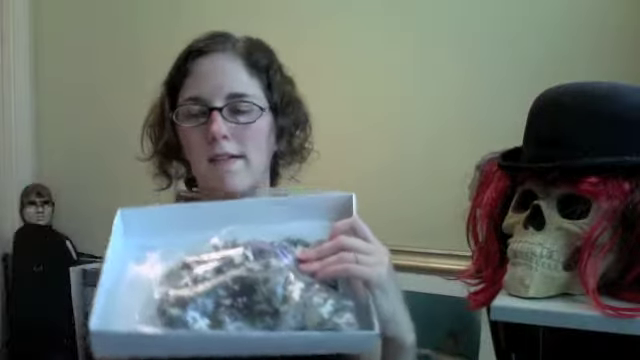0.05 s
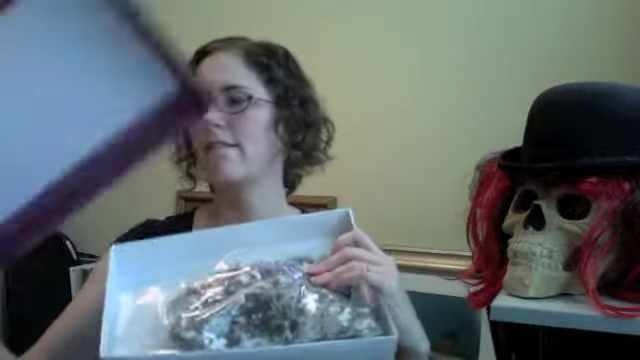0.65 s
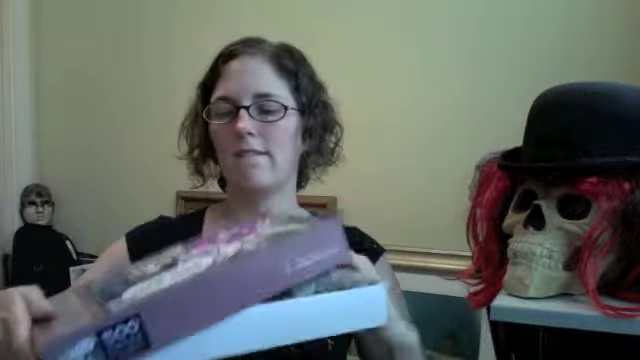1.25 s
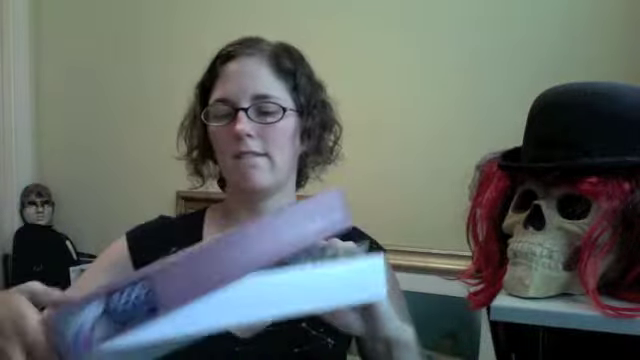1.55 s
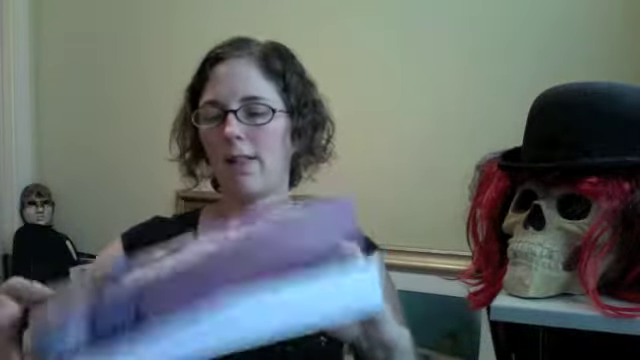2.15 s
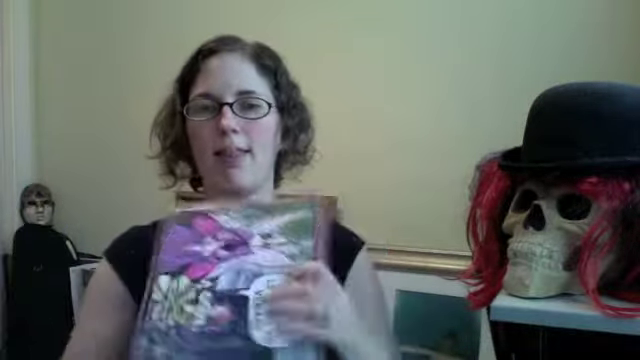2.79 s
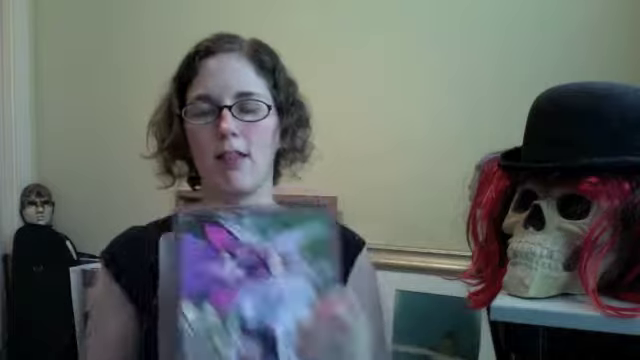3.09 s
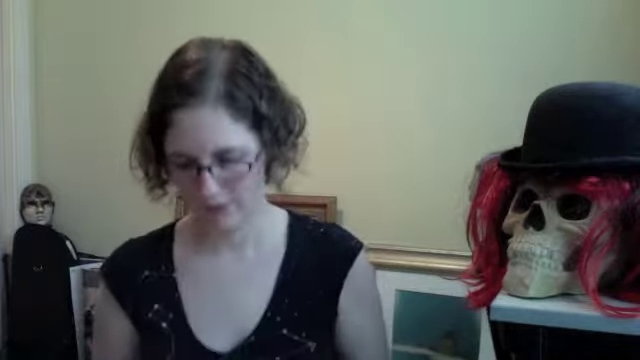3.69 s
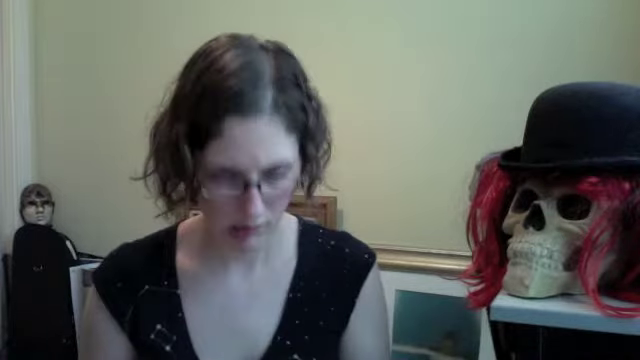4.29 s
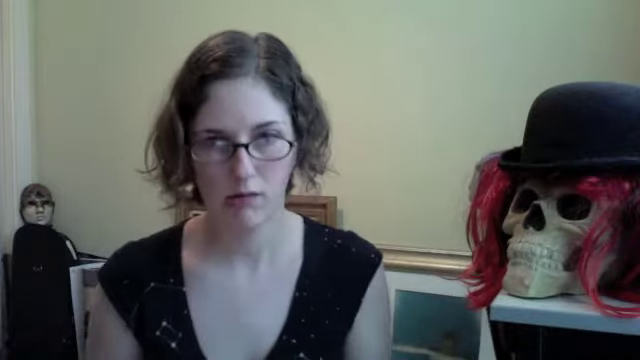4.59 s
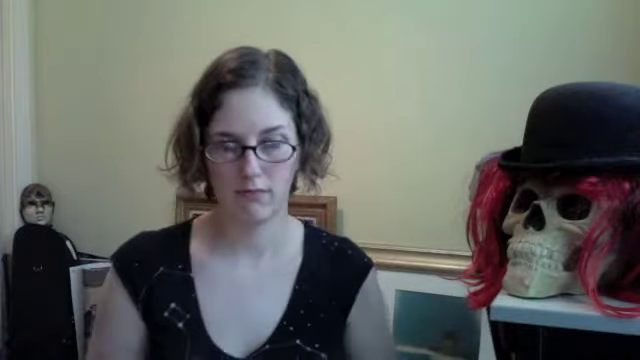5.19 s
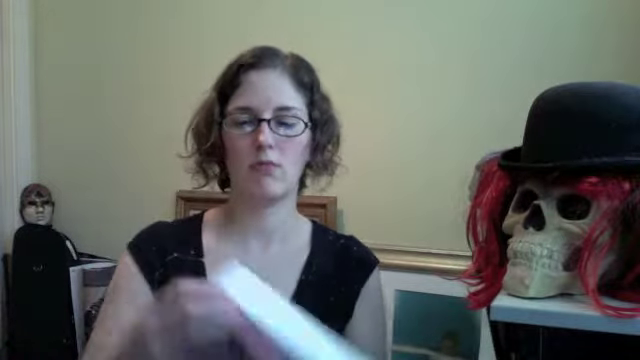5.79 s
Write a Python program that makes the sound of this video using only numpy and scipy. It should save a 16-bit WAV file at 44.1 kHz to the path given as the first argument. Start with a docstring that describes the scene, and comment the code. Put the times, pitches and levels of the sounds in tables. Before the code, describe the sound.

A cardboard box holding a plastic bag of puzzle pieces is handled near a small microphone in a small room. After a few light taps, the lid claps on with a quick cluster of hollow knocks, then scrapes and creaks as it is worked down. The box bumps on a desk several times, hands slide over it, and the bag crinkles faintly. A soft hiss and low hum lie behind.

```python
"""A small room: a cardboard box holding a plastic bag of puzzle pieces is closed, handled and put down.
The lid claps on and the box bumps on a desk; each blow rings the walls, thumps the box and jostles
the pieces. Card sticks and slips on card in creaks, rasps and scrapes, hands hiss over it,
and the bag and pieces crinkle and tick. Behind it are a soft hiss, a faint electronic whine,
a low hum and the drone of a far engine."""
import sys
import numpy as np
from scipy import signal
from scipy.fft import rfft, irfft, next_fast_len
from scipy.io import wavfile
from scipy.ndimage import uniform_filter1d

SR = 44100
rng = np.random.default_rng(int(sys.argv[2]) if len(sys.argv) > 2 else 0)


def wav_out(sig):
    """Save sig, one row per channel (or a flat mono array), as 16-bit PCM at SR to the path in sys.argv[1]."""
    wavfile.write(sys.argv[1], SR, np.round(np.clip(np.atleast_2d(sig).T, -1, 1) * 32767).astype(np.int16))


N = 266805
EVENT_N = int(0.35 * SR)
EVENT_T = np.arange(EVENT_N) / SR


def from_db(db):
    """Decibels to gain."""
    return 10 ** (np.asarray(db) / 20)


def in_time(rows):
    """Each column of a time curve at every sample."""
    times, *columns = np.transpose(rows)
    return [np.interp(np.arange(N) / SR, times, column) for column in columns]


def at_hz(points, hz):
    """Interpolate on a log-frequency axis."""
    points_hz, values = np.transpose(points)
    return np.interp(np.log(np.maximum(hz, 1)), np.log(points_hz), values)


def colour(x, spectrum):
    """Shape by a spectrum; rms 1."""
    size = next_fast_len(len(x))
    gain = from_db(at_hz(spectrum, np.fft.rfftfreq(size, 1 / SR)))
    shaped = irfft(rfft(x, size) * gain, size)[:len(x)]
    return shaped / np.std(shaped)


def cut(x, hz, kind, order=2):
    """Butterworth filter."""
    return signal.sosfilt(signal.butter(order, np.clip(hz, 10, 0.45 * SR), kind, fs=SR, output="sos"), x)


def resonance(x, hz, width_hz, order=2):
    """Band-pass by centre and width."""
    return cut(x, [hz - width_hz / 2, hz + width_hz / 2], "band", order)


def fade(t60_s):
    """Exponential decay over one event."""
    return np.exp(-np.log(1000) * EVENT_T / t60_s)


def peak_one(x):
    """Scale the loudest 6 ms to rms 1."""
    return x / np.sqrt(uniform_filter1d(x * x, size=256).max())


def add(track, start_s, sound):
    """Mix a sound in at a time."""
    i = max(int(start_s * SR), 0)
    track[i:i + len(sound)] += sound[:max(len(track) - i, 0)]


def struck(modes, spread_db):
    """Decaying modes; strengths vary with where the blow lands."""
    return sum(from_db(db + rng.normal(0, spread_db)) * fade(t60_s) * np.cos(2 * np.pi * hz * EVENT_T)
               for hz, db, t60_s in modes)


def grains(size, per_s, spread_db, smooth):
    """Fibres catch and let go: uneven clicks over smooth noise."""
    clicks = (rng.random(size) < per_s / SR) * rng.choice([-1, 1], size)
    clicks = clicks * from_db(spread_db * np.minimum(rng.exponential(1, size), 4))
    return clicks / (np.std(clicks) + 1e-9) + smooth * rng.standard_normal(size)


def strokes(rows, column, attack_s=0.021, sag_db_per_s=31, release_db_per_s=196):
    """Stroke envelope: attack, sag, release. Rows begin t/s, length/s; column picks the level/dB."""
    t, power = np.arange(N) / SR, 0
    for row in rows:
        start_s, length_s = row[:2]
        age_s = np.maximum(t - start_s, 0)
        db = row[column] - sag_db_per_s * age_s - release_db_per_s * np.maximum(age_s - length_s, 0)
        power += (np.minimum(age_s / attack_s, 1) * from_db(db)) ** 2
    return np.sqrt(power)


def drone(hz, db, waver=0.18):
    """A tone on a pitch curve, wavering in level and phase."""
    wobble = waver * colour(rng.standard_normal(N), [(1, -2.5), (6, -20.5), (30, -46.5), (200, -101)])
    phase = 2 * np.pi * np.cumsum(hz) / SR + wobble[::-1]
    return np.sqrt(2) * from_db(db) * (1 + wobble) * np.sin(phase)


# room noise: f/Hz, density/dB
AIR_SPECTRUM = [(15, -63), (25, -7), (69, -7.5), (110, 0.5), (156, -0.5), (305, -8), (421, -2.5),
                (598, -10.5), (919, -11), (1570, -20), (3440, -23.5), (4620, -31.5), (7700, -32),
                (10900, -36.5), (15500, -45)]


def air(level_db=-59):
    """Soft steady hiss, strongest in the bass."""
    return from_db(level_db) * colour(rng.standard_normal(N), AIR_SPECTRUM)


def whine(level_db=-86):
    """A narrow band of electronic hiss."""
    band = resonance(rng.standard_normal(N), hz=7460, width_hz=340)
    return from_db(level_db) * band / np.std(band)


# hum: t/s, f/Hz, level/dB
HUM_CURVE = [(0, 69.8, -92), (4.2, 69.6, -69), (4.33, 77.4, -62), (4.46, 90.5, -61.5), (4.53, 93, -50),
             (4.61, 94, -57.5), (4.95, 89.6, -61.5), (5.5, 91, -61), (6.05, 94.65, -58)]


def hum():
    """A low tone that rises and swells late."""
    return drone(*in_time(HUM_CURVE))


# engine: t/s, firing rate/Hz, level/dB
ENGINE_CURVE = [(0, 44, -52.5), (0.3, 43.7, -58.5), (0.75, 47, -59), (1.7, 48, -59), (1.95, 45, -64),
                (2.5, 44.3, -68), (3.0, 46, -63), (3.4, 47.5, -61.5), (4.2, 46, -66.5), (6.05, 46, -69)]
# partials: multiple, rel. level/dB
ENGINE_PARTIALS = [(2, -9.5), (3, -3), (4, -10)]


def engine():
    """A far engine draws away: harmonics of its firing rate."""
    firing_hz, engine_db = in_time(ENGINE_CURVE)
    return sum(drone(multiple * firing_hz, engine_db + db) for multiple, db in ENGINE_PARTIALS)


# room decay: f/Hz, t60/s
ROOM_DECAY = [(100, 0.27), (300, 0.25), (700, 0.25), (2000, 0.22), (5000, 0.061), (14000, 0.22)]
# desk and wall echoes: delay/s, gain
EARLY_ECHOES = [(.0058, 0.095), (.0083, 0.042), (0.016, 0.075)]


def room(x, wet_db):
    """Early echoes, then a diffuse tail that dies soonest near 5 kHz."""
    edges_hz = np.geomspace(60, 16000, 9)
    tail = sum(cut(rng.standard_normal(EVENT_N), [lo, hi], "band") * fade(at_hz(ROOM_DECAY, np.sqrt(lo * hi)))
               for lo, hi in zip(edges_hz, edges_hz[1:]))
    tail *= np.clip(EVENT_T / 0.016, 0, 1) ** 2
    response = from_db(wet_db) * tail / np.linalg.norm(tail)
    response[0] += 1
    for delay_s, gain in EARLY_ECHOES:
        add(response, delay_s, np.array([gain]))
    return signal.fftconvolve(x, response)[:N]


# plastic film: f/Hz, density/dB
FILM_SPECTRUM = [(2000, -8), (4500, -2), (5700, 7), (7300, -2.5), (9000, 3.5), (11500, 0.5), (13500, -5),
                 (15500, -14)]
# bag settling: t/s, length/s, level/dB
BAG_CRINKLES = [(0.0, 0.082, -69), (2.74, 0.05, -71), (3.228, 0.12, -64.5), (3.62, 0.18, -62.5),
                (3.89, 0.11, -60), (4.06, 0.18, -70), (4.728, .21, -51), (5.03, 0.04, -60),
                (5.68, 0.032, -66.5)]


def crinkling(snaps_per_s=1800, low_hz=4460, high_hz=15100, spread_db=2.5):
    """Creases in the film let go in a dense shower, each ringing at its own pitch."""
    shower, ring = np.zeros(N), fade(t60_s=0.044)[:SR // 10]
    for when, pitch, size in rng.random((int(snaps_per_s * N / SR), 3)):
        hz = low_hz + pitch * (high_hz - low_hz)
        db = spread_db * min(-np.log(size), 3)
        add(shower, when * N / SR, from_db(db) * ring * np.sin(2 * np.pi * hz * EVENT_T[:len(ring)]))
    return strokes(BAG_CRINKLES, column=2) * colour(shower, FILM_SPECTRUM)


# skin on card: f/Hz, density/dB
SKIN_SPECTRUM = [(1500, -3), (3400, 11), (4200, 7), (5000, 13), (6500, -4), (7400, -16), (8000, 9),
                 (8600, 10), (11000, 11), (14300, -4), (15500, -16)]
# hand strokes: t/s, length/s, hiss/dB, sing/dB
HAND_SLIDES = [(3.217, 0.06, -67, -61), (3.29, 0.038, -60, -57), (3.62, 0.14, -71, -70),
               (3.882, 0.089, -61, -74), (4.065, 0.27, -81, -66), (4.681, 0.04, -71, -72.5),
               (4.718, 0.26, -54, -63), (4.832, 0.068, -61, -55), (5.014, 0.05, -64, -72),
               (5.146, 0.28, -75.5, -76), (5.71, 0.26, -77, -85)]


def sliding(flicker_db=2.6):
    """Skin hisses on smooth card, each band flickering on its own; the pressed card sings."""
    skin = colour(grains(N, per_s=1100, spread_db=0.5, smooth=0.85), SKIN_SPECTRUM)
    hiss = np.zeros(N)
    edges_hz = np.linspace(1500, 16000, 12)
    for band_hz in zip(edges_hz, edges_hz[1:]):
        flicker = colour(rng.standard_normal(N), [(1, 2), (15, 3), (60, -20), (300, -28), (2000, -92)])
        hiss += from_db(flicker_db * flicker) * cut(skin, band_hz, "band", order=3)
    sing = resonance(grains(N, per_s=1300, spread_db=-4, smooth=0.93), hz=5680, width_hz=1160)
    return strokes(HAND_SLIDES, column=2) * hiss + strokes(HAND_SLIDES, column=3) * sing / np.std(sing)


# dull scrape and fine grit: f/Hz, density/dB
BODY_SPECTRUM = [(120, -17), (280, 6), (430, 8), (700, 1), (1100, -2.5), (1600, -10.5), (3000, -36.5)]
GRIT_SPECTRUM = [(900, -2), (1800, 11), (2600, 6), (3500, 10.5), (4500, 2.5), (6000, 4.5), (8000, -2),
                 (12000, -8), (15500, -63)]
# card and bag drags: t/s, length/s, rel. body/dB, rel. grit/dB
DRAGS = [ (0, 0.042, -46.5, -55), (0.65, 0.08, -55, -61), (1.124, 0.041, -49, -32), (1.36, 0.19, -50, -51),
         (1.634, 0.22, -53, -54.5), (1.869, 0.51, -52.5, -55.5), (2.456, 0.19, -47, -58),
         (2.632, 0.12, -41, -53), (2.726, 0.036, -36.5, -42.5), (2.855, 0.91, -53, -55.5),
         (3.294, 0.084, -38.5, -54), (3.578, 0.47, -52, -53.5), (3.975, 0.45, -53.5, -54.5),
         (4.717, 0.028, -46.5, -46.5), (4.956, 0.16, -51, -55), (5.13, 0.41, -49, -54),
         (5.56, 0.22, -60, -57.5), (5.81, 0.24, -50, -54)]


def rubbing():
    """The lid drags and the bag shifts; a floor remains, as the held box is never quite still."""
    shape = dict(attack_s=0.02, sag_db_per_s=8, release_db_per_s=162)
    body_gain = np.hypot(from_db(-74.5), strokes(DRAGS, column=2, **shape))
    grit_gain = np.hypot(from_db(-64), strokes(DRAGS, column=3, **shape))
    body = colour(grains(N, per_s=1500, spread_db=8, smooth=0.74), BODY_SPECTRUM)
    grit = colour(grains(N, per_s=2100, spread_db=-0.5, smooth=0.62), GRIT_SPECTRUM)
    return from_db(-4.5) * body_gain * body + from_db(-9) * grit_gain * grit


# lid creaks: start/s, end/s, rel. level/dB, slip rate/Hz, resonance/Hz
LID_CREAKS = [(1.625, 1.72, -49, 100, 1080), (1.806, 1.857, -52, 146, 957), (2.609, 2.678, -55, 176, 1745),
              (3.293, 3.352, -48.5, 110, 1630), (5.749, 5.793, -53.5, 156, 763),
              (5.903, 5.927, -57, 180, 1550), (5.983, 6.015, -54, 120, 1400),
              (6.023, 6.056, -49.5, 120, 1380)]


def creaks():
    """The lid sticks and slips; each slip rings a panel briefly, with a puff of grit."""
    out = np.zeros(N)
    for start_s, end_s, db, slip_hz, hz in LID_CREAKS:
        slips_s = start_s + np.cumsum(np.r_[0, rng.uniform(0.5, 1.5, 60)]) / slip_hz
        for slip_s in slips_s[slips_s < end_s]:
            detune = from_db(rng.normal(0, 1.2))
            modes = [(hz * detune, 0, 0.025), (hz * 0.8, -8, 0.02), (hz * 1.45, -12, 0.015)]
            ring = struck(modes, spread_db=2)
            grit = 1.2 * rng.standard_normal(EVENT_N) * fade(0.044)
            slip = cut((ring + grit) * (1 - fade(0.0086)), [hz / 2, hz * 1.35], "band")
            add(out, slip_s, from_db(db + rng.normal(0, 1)) * peak_one(slip))
    return out


# card and film resonances: f/Hz, width/Hz, level/dB
PAPER_BANDS = [(2840, 330, 2), (3480, 290, -0.5), (5720, 320, -2), (8670, 170, 2)]


def papery(x):
    """Add the narrow treble resonances of thin card."""
    return x + sum(from_db(db) * resonance(x, hz, width_hz, order=1) for hz, width_hz, db in PAPER_BANDS)


def boxed(x, delays_s=(0.0002, 0.0025), gain=0.66):
    """Four reflections inside the box give each spot its own hollow colour."""
    out = x.copy()
    for delay_s, sign in zip(rng.uniform(*delays_s, size=4), rng.choice([-1, 1], size=4)):
        add(out, delay_s, sign * gain * x)
    return out


# edge over card: t/s, length/s, level/dB, slip rate/Hz, low/Hz, high/Hz
EDGE_RASPS = [(0.006, 0.025, -49, 540, 3100, 3940), (1.384, 0.063, -54, 230, 800, 5470),
              (1.489, 0.035, -57.5, 340, 900, 3600), (1.66, 0.073, -54, 260, 855, 2540),
              (1.884, 0.04, -61.5, 890, 3200, 3570), (1.957, 0.046, -62, 450, 700, 3500),
              (2.711, 0.022, -46, 520, 1300, 2430), (3.308, .012, -46, 420, 900, 3800),
              (3.336, .012, -52, 500, 1500, 6000), (5.843, 0.027, -54.5, 880, 3620, 4400),
              (5.868, .018, -51, 600, 2390, 3970), (5.895, .008, -38, 460, 1150, 2030),
              (5.902, 0.015, -44.5, 420, 1100, 3640), (5.926, .028, -63, 450, 2300, 3520)]


def rasps(attack_s=0.0017, release_db_per_s=900, jitter=0.13):
    """A card edge slips hundreds of times a second; each slip rings the card."""
    out = np.zeros(N)
    for start_s, length_s, db, slip_hz, low_hz, high_hz in EDGE_RASPS:
        uneven = np.repeat(rng.standard_normal(EVENT_N), 64)[:EVENT_N]
        slip_count = np.floor(np.cumsum(slip_hz * (1 + jitter * uneven)) / SR)
        slips = np.diff(slip_count, prepend=-1)
        grit = 0.081 * rng.standard_normal(EVENT_N)
        rasp = cut(papery(boxed(slips + grit)), [low_hz, high_hz], "band", order=4)
        release_db = release_db_per_s * np.maximum(EVENT_T - length_s, 0)
        gain = np.minimum(EVENT_T / attack_s, 1) * from_db(db - release_db)
        add(out, start_s, gain * rasp / np.std(rasp))
    return out


# bag, pieces, fingernails: t/s, rel. level/dB, f/Hz, half t60/s
SMALL_TICKS = [ (0.006, -40, 3700, 0.024), (0.017, -47.5, 3600, 0.057), (0.035, -55, 3680, 0.027),
               (0.056, -48, 4050, 0.077), (0.085, -61, 5000, 0.052), (0.48, -46, 2470, 0.051),
               (0.489, -51, 5040, 0.021), (0.583, -65, 4000, 0.018), (0.594, -48.5, 4570, 0.038),
               (0.603, -67, 3100, 0.03), (0.666, -45.5, 6800, 0.0076), (0.691, -61, 9100, .03),
               (0.714, -53, 9500, 0.024), (0.742, -51.5, 11100, 0.029), (1.036, -46.5, 6900, 0.069),
               (1.128, -30.5, 5100, 0.016), (1.138, -42, 7000, 0.011), (1.15, -35, 6360, 0.025),
               (1.1865, -30, 6000, 0.012), (1.188, -35, 12000, 0.02), (1.194, -35.5, 10500, 0.02),
               (1.246, -35.5, 3500, 0.068), (1.376, -33, 4370, 0.027), (1.38, -40.5, 10800, 0.045),
               (1.422, -40.5, 4400, 0.037), (1.4757, -36.5, 2970, 0.046), (1.536, -44.5, 3600, 0.0077),
               (1.612, -48, 3580, .06), (1.672, -37, 3260, 0.056), (1.697, -42.5, 7200, 0.076),
               (1.7625, -36, 4230, 0.007), (1.765, -39, 3970, 0.077), (1.7653, -38.5, 11400, 0.013),
               (1.9649, -44.5, 3300, 0.018), (2.028, -50, 3460, 0.025), (2.151, -35.5, 3060, 0.0053),
               (2.167, -36.5, 5350, 0.01), (2.387, -50, 3600, 0.015), (2.397, -45, 4220, 0.029),
               (2.411, -47, 3800, 0.033), (2.4939, -32.5, 2550, 0.016), (2.572, -46.5, 2160, 0.067),
               (2.642, -50, 10940, 0.079), (2.718, -40, 4200, 0.13), (2.742, -31.5, 5060, 0.028),
               (2.751, -35, 5240, 0.023), (2.765, -42, 4830, 0.025), (2.786, -43, 4100, 0.068),
               (3.179, -52, 2480, 0.033), (3.226, -47.5, 6050, 0.093), (3.241, -49.5, 13000, 0.065),
               (3.307, -41, 4190, 0.13), (3.4341, -34, 8100, 0.061), (3.5561, -36.5, 6900, 0.045),
               (3.597, -40.5, 2460, 0.033), (3.605, -46, 6160, 0.03), (3.631, -50, 5600, 0.015),
               (3.711, -42, 1410, 0.054), (4.7363, -40.5, 3450, 0.028), (5.336, -45, 6100, 0.026),
               (5.346, -38.5, 2830, 0.02), (5.744, -40.5, 5870, 0.052), (5.845, -60, 5300, 0.041),
               (5.869, -43.5, 5330, 0.037), (5.907, -53, 5510, 0.023), (5.942, -43.5, 2870, .025),
               (6.026, -43, 5420, 0.021)]


def ticks(first_snap_db=21, film_hz=7060, film_db_per_octave=14.5):
    """A snap breaks into tiny ones; the card answers lower down, less so for the film's high ticks."""
    out = np.zeros(N)
    for start_s, db, hz, half_t60_s in SMALL_TICKS:
        snap = grains(EVENT_N, per_s=2500, spread_db=2.5, smooth=0.79) * fade(2.02 * half_t60_s)
        snap[0] += from_db(first_snap_db)
        snap = papery(cut(boxed(snap), [hz / 2.37, hz * 1.29], "band", order=3))
        card = cut(rng.standard_normal(EVENT_N) * fade(0.07), [600, 1400], "band")
        card_db = db - 1 - film_db_per_octave * max(np.log2(hz / film_hz), 0)
        add(out, start_s, from_db(db) * peak_one(snap) + from_db(card_db) * peak_one(card))
    return cut(out, hz=13000, kind="low", order=4)


def regripped(modes, detune=0.014):
    """Each new grip bends the card and shifts its modes."""
    return [(hz * (1 + rng.normal(0, detune)), db, t60_s) for hz, db, t60_s in modes]


# box walls: f/Hz, level/dB, t60/s
WALL_MODES = [(255, 4.5, 0.11), (316, -13, .06), (380, -5, 0.067), (416.6, 7.5, 0.16), (476, 2, 0.057),
              (578, 9.5, 0.062), (650, 4.5, .1), (730.6, 11, .1), (944, 3, 0.064), (1007, 7.5, 0.073),
              (1070, 0, 0.074), (1124, 3, 0.079), (1236, 2.5, 0.18), (1343, -11.5, .08), (1730, -8, .08),
              (1875, -11.5, 0.073), (2750, 14, .095)]
# loose pieces shaking the walls: f/Hz, density/dB
JOSTLE_SPECTRUM = [(120, -38), (310, -12), (430, -1), (700, -8.5), (1150, -8.5), (1550, -8.5),
                   (3000, -24.5)]


def wall_ring(envelope, contact_hz, panel_hz, t60_cycles=19):
    """The struck panel and the walls ring; the loose pieces jump a moment later."""
    panel = peak_one(np.sin(2 * np.pi * panel_hz * EVENT_T) * fade(t60_cycles / panel_hz))
    jostle = colour(rng.standard_normal(EVENT_N), JOSTLE_SPECTRUM) * (fade(0.16) - fade(0.0056))
    walls = peak_one(struck(regripped(WALL_MODES), spread_db=1.5))
    ring = cut((walls + from_db(-1) * (panel + jostle)) * envelope, contact_hz, "low", order=5)
    return peak_one(cut(ring, 0.21 * contact_hz, "high"))  # hard contacts barely move the lowest modes


# whole box and its air: f/Hz, level/dB, t60/s
THUMP_MODES = [(92.5, -8.5, 0.13), (147.5, 0, 0.074), (207.4, -0.5, 0.065), (254.5, 0.5, 0.084)]


def box_thump(swell, hz):
    """The whole box and the air in it ring low."""
    ring = struck(regripped(THUMP_MODES), spread_db=4)
    return peak_one(cut(ring * swell, [hz / 1.38, hz * 1.4], "band"))


# struck edge: f/Hz, density/dB
CRACK_SPECTRUM = [(600, -10.5), (1200, 16.5), (1540, -2), (1800, 14), (2200, 7), (2780, 3), (3700, -2.5),
                  (4600, -8.5), (6200, -3.5), (7500, -10), (11000, -19), (15500, -41)]


def edge_crack(crush_s):
    """Fibres crack at the edge, for longer in a slow crush."""
    fibres = papery(colour(grains(EVENT_N, per_s=4000, spread_db=1, smooth=0.16), CRACK_SPECTRUM))
    return peak_one(boxed(fibres) * (fade(0.082 + 6 * crush_s) + from_db(-14) * fade(0.41)))


def knocks(rows, full_scale_crack_db, thump_hz, crack_db_per_db=0.81):
    """Each blow rings, thumps and cracks; a soft contact is duller and swells more slowly."""
    out = np.zeros(N)
    for start_s, wall_db, thump_db, contact_hz, crush_s, panel_hz, damping_t60_s in rows:
        swell = 1 - np.exp(-EVENT_T / crush_s)
        wall = from_db(wall_db) * wall_ring(swell * fade(damping_t60_s), contact_hz, panel_hz)
        thump = from_db(thump_db) * box_thump(swell, thump_hz)
        crack = from_db(full_scale_crack_db + crack_db_per_db * wall_db) * edge_crack(crush_s)
        add(out, start_s, wall + thump + crack)
    return out


# box on desk: t/s, wall/dB, thump/dB, contact cut-off/Hz, crush/s, panel/Hz, damping t60/s
DESK_BLOWS = [ (3.482, -41.5, -64, 850, 0.0024, 525, 0.28), (3.526, -24.5, -39, 850, 0.0021, 772, 0.2),
              (3.535, -26, -36, 607, 0.0026, 430, 0.094), (3.711, -39.5, -39.5, 570, 0.002, 304, 0.22),
              (3.792, -21, -50, 620, 0.0022, 470, 0.19), (3.799, -26.5, -49, 750, .002, 690, 0.21),
              (4.754, -33, -49, 940, 0.0031, 790, 0.24), (4.830, -27, -51, 858, 0.00048, 507, 0.075),
              (5.16, -34.5, -51, 544, 0.0017, 428, 0.085), (5.187, -32.5, -65, 624, 0.0038, 410, 0.066),
              (5.2331, -41.5, -77, 1500, 0.00087, 786, 0.089), (5.282, -38.5, -52, 1080, 0.0013, 785, 0.11),
              (5.335, -19.5, -30.5, 1120, 0.00082, 676, 0.11), (5.345, -24, -32.5, 1280, 0.00074, 970, 0.2),
              (5.416, -39, -67, 1035, 0.0014, 860, 0.25), (5.981, -49.5, -42, 618, .004, 392.8, 0.75),
              (6.007, -40, -42, 811, 0.0011, 440, 0.19), (6.025, -37.5, -43, 1170, 0.0028, 805, 0.3),
              (6.038, -33, -41.5, 1507, 0.0046, 1260, 0.35)]


def desk_bumps():
    """The box meets the desk, with little crack."""
    return knocks(DESK_BLOWS, full_scale_crack_db=-41, thump_hz=235)


# lid on box: t/s, wall/dB, thump/dB, contact cut-off/Hz, crush/s, panel/Hz, damping t60/s
LID_BLOWS = [ (0.047, -36, -46, 200, 0.019, 152.7, 0.98), (0.056, -43, -44, 1580, 0.0029, 770, 0.29),
             (0.077, -42, -46, 1580, 0.002, 960, 0.17), (0.599, -41.5, -64, 890, 0.0016, 655, 0.049),
             (1.1282, -26, -41, 1290, 0.0013, 700, 0.16), (1.1455, -22.5, -29.5, 1050, 0.002, 530, 0.21),
             (1.164, -28.5, -33, 810, 0.00073, 433, 0.08), (1.1861, -7, -39, 1310, 0.00021, 1076, 0.086),
             (1.195, -37, -26, 1210, 0.00052, 690, 0.02), (1.2035, -16, -33, 1130, 0.00016, 685, 0.048),
             (1.226, -35, -37, 1110, .002, 265, 0.066), (1.243, -29.5, -63, 1340, .002, 700, 0.12),
             (1.477, -35, -46, 1560, 0.0019, 1130, 0.22), (1.976, -40, -54, 1130, 0.0018, 715, 0.17),
             (2.151, -30, -33.5, 615, 0.002, 437, 0.27), (2.399, -41, -49, 1055, 0.0013, 655, 0.27),
             (2.493, -27.5, -43.5, 1090, 0.00012, 368, 0.096), (2.496, -33, -52, 1510, .0005, 1210, 0.11),
             (2.622, -41, -72, 865, 0.0017, 474, 0.25), (2.653, -40.5, -66, 780, 0.0026, 415, 0.35),
             (2.716, -30.5, -55, 960, 0.0091, 406, 0.56), (2.743, -31.5, -44, 990, 0.00052, 681, 0.44),
             (2.904, -56, -43.5, 485, 0.0018, 298, .2), (3.284, -37, -71, 814, 0.02, 420, 0.49),
             (3.308, -29.5, -58, 1190, 0.0025, 840, 0.8), (3.341, -33.5, -48, 1020, 0.0022, 415, 0.37),
             (3.556, -36, -43.5, 1300, .002, 1010, 0.1), (5.845, -47.5, -70, 1020, 0.0022, 744, .5),
             (5.871, -43, -68, 970, 0.0022, 634, 0.17), (5.908, -37, -55, 799, 0.00088, 664, 0.12)]


def lid_claps():
    """Card strikes card; held in the hands, the box thumps deeper than on the desk."""
    return knocks(LID_BLOWS, full_scale_crack_db=-18.5, thump_hz=150.7)


def scene():
    """The handled box in the room, over the background."""
    blows = lid_claps() + desk_bumps() + from_db(-6) * ticks()
    friction = from_db(2) * creaks() + rasps() + rubbing() + sliding()
    box = room(blows + friction + crinkling(), wet_db=-16)
    return (box + air() + engine() + hum() + whine())[None]


def record(dry, ceiling=1.1, bass_hz=64, top_hz=15700):
    """A small microphone: peaks rounded, deep bass and top cut."""
    rounded = cut(ceiling * np.tanh(dry / ceiling), bass_hz, "high", order=3)
    return signal.sosfilt(signal.ellip(10, 0.2, 80, top_hz, fs=SR, output="sos"), rounded)


dry = scene()
out = record(dry)
wav_out(out)
```